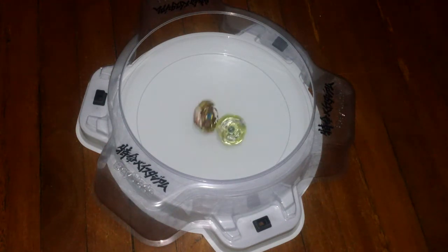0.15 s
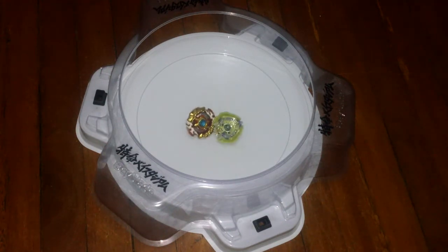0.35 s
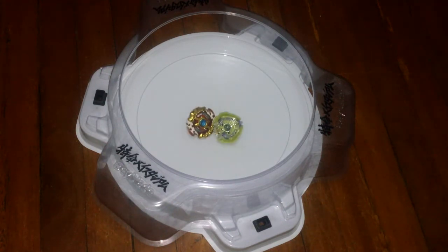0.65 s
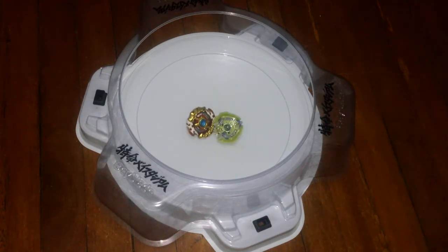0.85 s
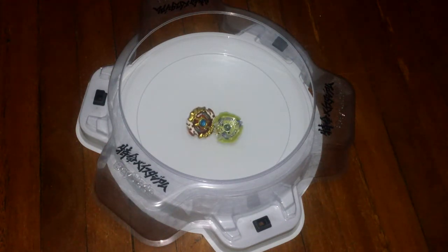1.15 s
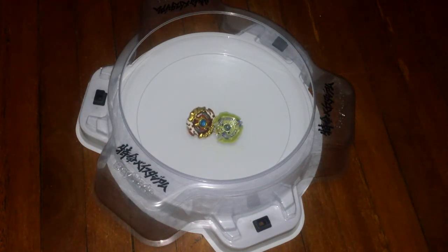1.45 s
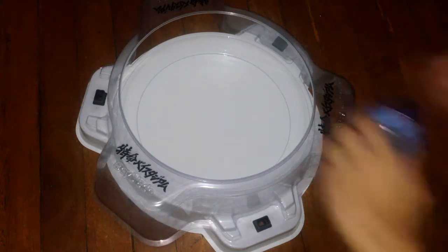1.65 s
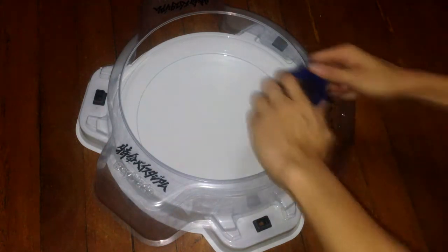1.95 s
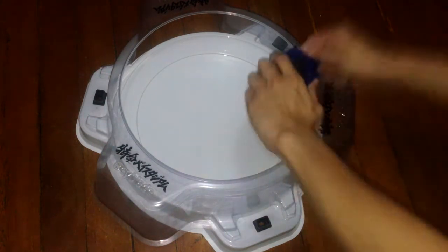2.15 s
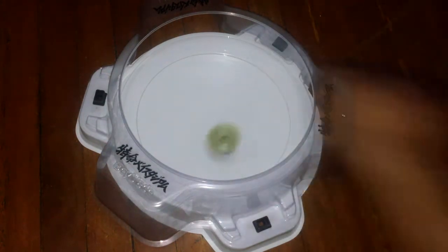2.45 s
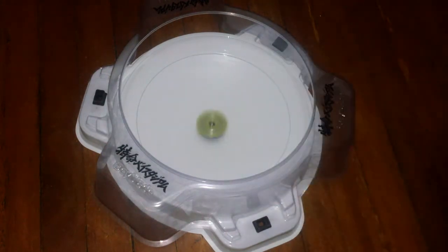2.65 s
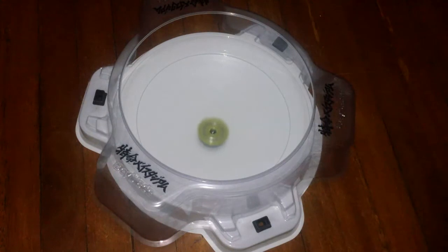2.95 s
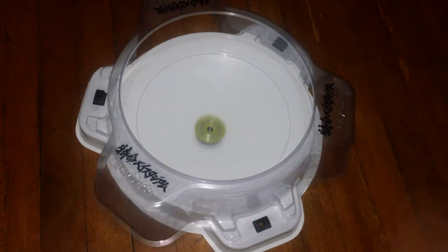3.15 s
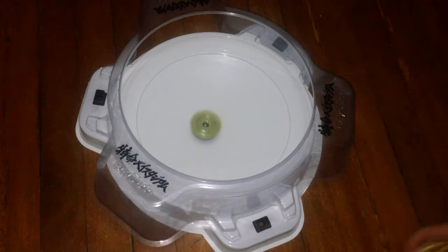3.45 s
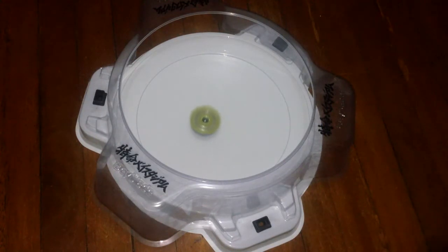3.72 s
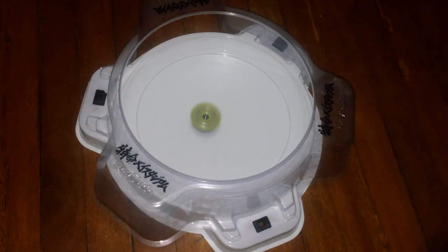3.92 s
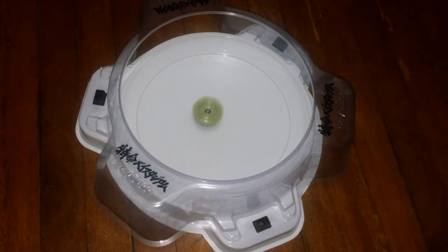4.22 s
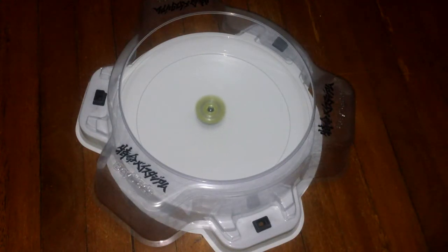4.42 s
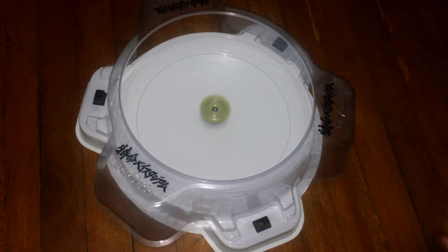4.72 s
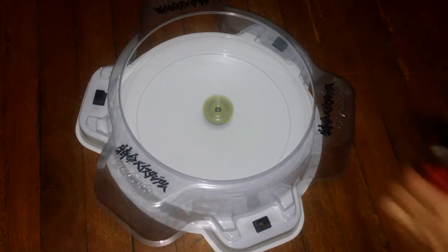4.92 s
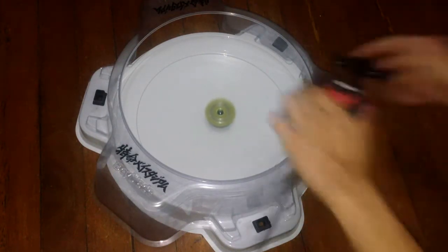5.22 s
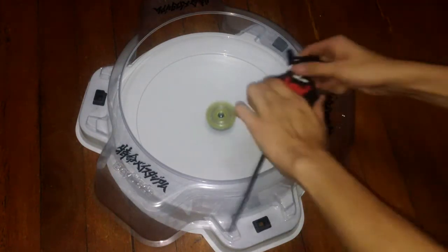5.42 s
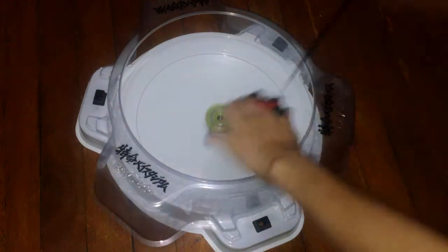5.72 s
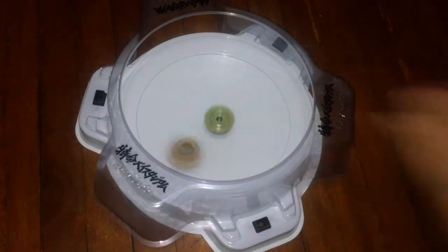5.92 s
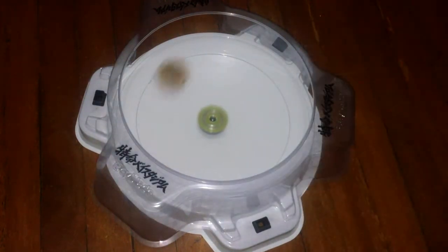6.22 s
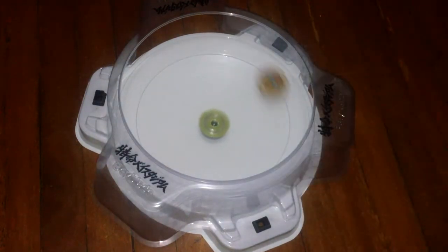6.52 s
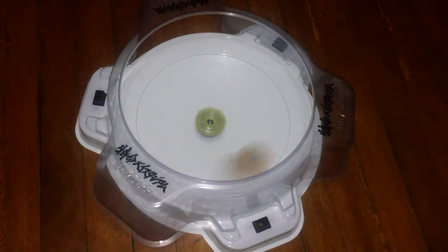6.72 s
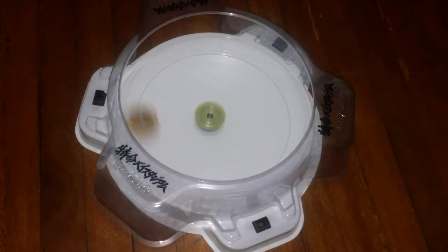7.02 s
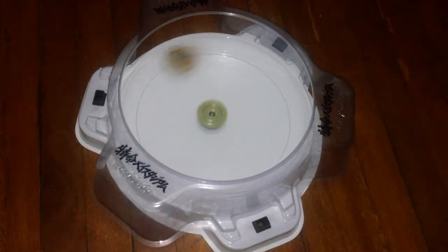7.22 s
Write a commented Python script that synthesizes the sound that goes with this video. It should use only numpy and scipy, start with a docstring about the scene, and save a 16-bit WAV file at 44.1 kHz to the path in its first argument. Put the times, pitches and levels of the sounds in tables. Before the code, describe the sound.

Close microphone, quiet hissy room with short echoes. Tops topple with a fading plastic rattle, then faint cord rasps and launcher clicks. A loud brightening ripcord rasp ends in a booming clack and quick bounces. Wooden knocks and a short scrape come as the launcher is put down, over a thin airy whirr. After light handling clicks, another rasp and clack launch a second top, which rumbles around the bowl in fluttering ticks.

```python
"""Two spent spinning tops topple and rattle to rest in a thin plastic bowl on a wooden floor, in a small room.
Twice a toothed ripcord rasps through a launcher, and a top drops into the bowl and bounces. The launcher is put down.
The first top whirrs at the centre; the second races round the rim, ticking once a turn and hitting the wall.
Blows and contacts shake ringing modes, the pitches at which a body rings; filtered noise makes whirr and hush."""
import sys
import numpy as np
from scipy import signal
from scipy.fft import rfft, irfft, next_fast_len
from scipy.io import wavfile
from scipy.ndimage import uniform_filter1d

SR = 44100
rng = np.random.default_rng(int(sys.argv[2]) if len(sys.argv) > 2 else 0)


def dump_mix(stems):
    """Bounce the given channels to the path in sys.argv[1] as a 16-bit WAV at rate SR."""
    frames = np.atleast_2d(stems).T  # one column per channel
    limited = np.clip(frames, -1, 1)  # hard clip at full scale
    pcm = np.round(limited * 32767).astype(np.int16)
    wavfile.write(sys.argv[1], SR, pcm)


N = 324884

# The ringing modes of the plastic bowl, the launcher shell and the floorboards.
# Each row: pitch in Hz, relative level in dB, time to die away by 60 dB in seconds.
BOWL_MODES = [(146, -10, 0.23), (203, -14, 0.086), (268, -3, 0.036), (307, 0.5, 0.067), (373, -4, 0.051),
              (489, -3, 0.083), (587, -2, 0.065), (699, 9, 0.0087), (941, -10.5, 0.058), (1010, 12, 0.051),
              (1514, -2, 0.01), (2510, 12.5, .03), (3010, 0, 0.023), (3840, -8.5, 0.016)]
LAUNCHER_MODES = [(485, -2.5, 0.047), (1020, -1, .015), (2020, 2, .012), (2530, 2.5, 0.054),
                  (2725, -7.5, 0.021), (3460, 2.5, 0.027), (3830, -4, 0.024), (3890, 10, 0.02),
                  (4735, 4.5, .016), (5100, -2, 0.012), (5644, 10, 0.0028), (7200, -2, 0.016)]
BOARD_MODES = [(320, -10, 0.072), (372, 18.5, 0.15), (440, 14, 0.081), (517, 25.5, 0.05), (970, 19, 0.035),
               (1165, 30, 0.041), (1890, -17, 0.071), (2900, -8, 0.063), (3700, 10, 0.013)]


def landing_blows():
    """Launched tops strike the bowl hard, then bounce."""
    # Blows of the tops on the bowl. Each row: time in seconds, clack level in dB, thump level in dB,
    # favoured pitch in Hz.
    landings = [(2.3517, -10, -1, 264), (2.5277, -15.5, -10, 380), (2.6237, -19.5, -16.5, 308),
                (2.6721, -26, -29, 280), (5.8113, -13.5, -1, 290), (5.9762, -20, -12.5, 790),
                (5.9982, -30.5, -17.5, 293), (6.0803, -25.5, -9.5, 460)]
    return bowl_blows(landings, first_db=25.5, lowest_hz=120, chatter_s=0.01, knock_db=-3.0, tick_db=-3)


def ripcord():
    """Teeth rattle over the gear and ring the launcher shell, denser and brighter as the cord speeds up."""
    # Pulls of the cord, speeding up evenly until it stops or comes free.
    # Each row: start in seconds, free in seconds, start level in dB, end level in dB.
    pulls = [(0.77, 0.811, -52, -44.5), (0.848, 0.908, -51.5, -42.5), (2.202, 2.307, -37, -14.5),
             (5.659, 5.752, -34, -22.5)]
    # Tone of the cord's rasp. Each row: frequency in Hz, level in dB per Hz.
    cord_colour = [(240, -63.5), (400, -31), (907, -15), (979, -8), (1520, -16), (2470, -7.5),
                   (2870, -13.5), (4070, -4), (4670, -9), (6130, -10), (15000, -28.5)]
    coast_db, coast_db_per_s = -2, 238.5  # the freed gear runs down: first drop, then fall per second
    teeth_per_s, full_speed_db = 6400, -13  # contacts at full speed, and the level of the rasp there
    slow_cord_hz, brightening = 3000, .3  # a slow cord loses the treble above this; dB per dB of speed

    t = np.arange(N) / SR
    speed = np.full(N, 1e-6)
    for start, free, start_db, end_db in pulls:
        pull = np.interp(t, [start - .03, start, free], [0, *from_db([start_db, end_db])])
        coast = from_db(end_db + coast_db - coast_db_per_s * np.maximum(t - free, 0))
        speed += np.where(t < free, pull, coast)
    share = np.clip(speed / from_db(full_speed_db), .03, 1)
    teeth = grains(teeth_per_s * np.sqrt(share), spread_db=3.5)
    # fewer contacts are made stronger, so that speed alone sets the level
    teeth = teeth / share ** .25 * from_db(0.87 * drift(30))
    shell = rms_one(ring(teeth, LAUNCHER_MODES[1:]))
    rasp = rms_one(colour(teeth, cord_colour) + from_db(-6.0) * shell)
    low = signal.sosfilt(signal.butter(2, slow_cord_hz, "low", fs=SR, output="sos"), rasp)
    high = signal.sosfilt(signal.butter(2, slow_cord_hz, "high", fs=SR, output="sos"), rasp)
    # the minus sign joins the two halves smoothly where they meet
    return speed * (low - high * share ** brightening)


def launcher_blows():
    """The latch, the release of the top and handling knock the launcher shell."""
    # Blows on the launcher. Each row: time in seconds, clack level in dB, favoured pitch in Hz.
    clacks = [(0.9387, -21, 5100), (1.0258, -33, 2650), (2.164, -31.5, 3460), (2.3027, -7, 2550),
              (3.8405, -52.5, 3460), (4.0255, -38.5, 4070), (4.0683, -45, 3080), (4.25, -43, 4410),
              (4.3274, -33, 4310), (4.538, -46.5, 2760), (4.8509, -48, 3500), (5.658, -19.5, 3600),
              (5.7385, -11, 4000), (5.7462, -2, 3730), (5.7552, -4, 3840)]
    # dB, and dB per dB of clack: only hard blows move the whole shell
    thump_db, thump_per_clack = -12.5, 2
    table = [(s, db, thump_db + thump_per_clack * db, hz) for s, db, hz in clacks]
    return blows(table, LAUNCHER_MODES, first_db=18, lowest_hz=200, chatter_s=0.0037, knock_db=-0.5,
                 tick_db=0.5, crack_db=2.0, crack_s=0.0011, rustle_db=-11.0, rustle_s=0.023)


def racing_top():
    """The leaning top touches hard once a turn, over a steady grind, and moves over the modes of the bowl."""
    # Path of the racing top. Each row: time in seconds, rumble level in dB,
    # pitch in Hz of the bowl modes under its tip.
    path = [(6.128, -33.5, 360), (6.22, -32.5, 343), (6.362, -35, 446), (6.5, -36.5, 510), (6.6, -32, 576),
            (6.67, -39.5, 412), (6.73, -34.5, 320), (6.81, -35.5, 430), (6.87, -27.5, 514),
            (6.93, -41.5, 433), (6.98, -36.5, 362), (7.06, -31, 514), (7.22, -32, 440), (7.37, -36, 473)]
    ticks_per_s = 43.5  # on average; the pace drifts
    base_scrape_db, scrape_follows = -41, 0.26  # at a rumble of -33 dB; share of its swing

    turns = np.cumsum(ticks_per_s * (1 + .04 * drift(4.4))) / SR
    touch = np.exp(-(turns % 1) / .1) * from_db(3 * drift(20))
    s, rumble_db, hz = np.transpose(path)
    scrape_db = base_scrape_db + scrape_follows * (rumble_db + 33)
    wobble = from_db(2.52 * drift(13.4))
    gains = gains_in_time(np.transpose([s, rumble_db, scrape_db])) * wobble
    under_hz = np.interp(np.arange(N) / SR, s, hz)
    contact = rng.standard_normal(N) * (0.41 + touch)
    return rolling(gains, BOWL_MODES, contact, ring_db=5.5, lowest_hz=52, under_hz=under_hz)


def wall_blows():
    """The racing top clatters along the wall of the bowl."""
    # Blows on the wall. Each row: time in seconds, clack level in dB, thump level in dB, favoured pitch in Hz.
    wall_hits = [(6.4008, -26, -17.5, 636), (6.4114, -26, -22, 300), (6.4345, -27.5, -15, 620),
                 (7.0779, -28.5, -16.5, 600), (7.1025, -23.5, -18, 505), (7.1194, -32, -19, 467)]
    return bowl_blows(wall_hits, first_db=29.5, lowest_hz=252, chatter_s=0.012, knock_db=1.5, tick_db=-4)


def rattle_blows():
    """Spent tops topple, rattle to rest and are lifted out, each contact a small blow on the bowl."""
    # Blows of the spent tops. Each row: time in seconds, clack level in dB, thump level in dB,
    # favoured pitch in Hz.
    rattles = [(0.0044, -32.5, -38, 275), (0.0459, -25, -47, 1020), (0.0733, -39, -32.5, 1020),
               (0.0879, -34, -33.5, 270), (0.1341, -47, -34.5, 220), (0.1594, -40.5, -40, 1550),
               (0.2242, -66, -61, 1020), (0.3249, -37.5, -42, 1520), (1.4618, -39.5, -43.5, 489),
               (1.508, -48, -51, 1960)]
    return bowl_blows(rattles, first_db=15, lowest_hz=119, chatter_s=0.017, knock_db=-1.5, tick_db=-8)


def toppling_tops():
    """Spent tops roll in the bowl with uneven contacts, fading away."""
    # Spells of toppling. Each row: start in seconds, end in seconds, fade in dB per second,
    # rumble level in dB, scrape level in dB.
    toppling = [(0.0, 0.41, 58.5, -38.5, -36.5)]
    contact = grains(900, spread_db=-2.0)
    return rolling(spells(toppling), BOWL_MODES, contact, ring_db=3.0, lowest_hz=80, under_hz=300)


def skidding_top():
    """A top skids in the bowl with dense, uneven contacts."""
    # Spells of skidding. Each row: start in seconds, end in seconds, fade in dB per second,
    # rumble level in dB, scrape level in dB.
    skidding = [(2.36, 2.72, 36, -43, -30.5)]
    contact = grains(3700, spread_db=2.0)
    return rolling(spells(skidding), BOWL_MODES, contact, ring_db=8.5, lowest_hz=80, under_hz=290)


def floor_blows():
    """Launcher and cord are put down, knocking on the floorboards."""
    # Blows on the boards. Each row: time in seconds, clack level in dB, thump level in dB, favoured pitch in Hz.
    knocks = [(2.7915, -23.5, -27.5, 3000), (2.8877, -24, -17, 370), (2.9289, -34, -17.5, 366),
              (2.9532, -32, -20.5, 364), (3.001, -18, -52, 3380), (3.0268, -29, -38, 5840),
              (3.0524, -35, -22.5, 530), (3.1263, -48, -32, 430), (3.2321, -47, -46, 5960),
              (3.2465, -49, -32.5, 480), (3.3162, -44, -63, 5550), (3.3485, -36, -25, 510),
              (3.3616, -37, -35.5, 504), (3.4442, -43, -46, 533), (3.465, -40, -66, 2260)]
    return blows(knocks, BOARD_MODES, first_db=28, lowest_hz=270, chatter_s=0.0085, knock_db=-1,
                 tick_db=-12.5, crack_db=15.5, crack_s=0.0024, rustle_db=-12.0, rustle_s=0.051)


def floor_sliding():
    """Launcher and cord slide over the boards with very uneven contacts."""
    # Spells of sliding. Each row: start in seconds, end in seconds, fade in dB per second,
    # rumble level in dB, scrape level in dB.
    sliding = [(2.895, 3.15, 30, -27.5, -42.5), (3.3, 3.5, 34.7, -45, -50)]
    contact = grains(900, spread_db=6.0)
    return rolling(spells(sliding), BOARD_MODES, contact, ring_db=-5.5, lowest_hz=277, under_hz=370)


def whirr():
    """Shaped noise: faint air hiss as the hands come in, then the unsteady whirr of the top at the centre."""
    # Spells of hiss, then whirr. Each row: start in seconds, end in seconds,
    # fade in dB per second (below zero it grows), level in dB.
    whirr_spells = [(1.8, 2.2, -11.5, -61), (2.36, 5.8, 0.57, -57)]
    # Tone of the moving air. Each row: frequency in Hz, level in dB per Hz.
    whirr_colour = [(350, -22), (600, -8), (1210, -6.5), (1590, -6.5), (1850, -6), (2840, -8), (3300, -7.5),
                    (3930, -6.5), (12000, -25), (15600, -54), (22000, -120)]
    air = colour(rng.standard_normal(N), whirr_colour)
    return spells(whirr_spells)[0] * air * from_db(1.474 * drift(25.5))


def hush():
    """Steady filtered noise: the quiet of the room and a soft hiss."""
    # Tone of the quiet. Each row: frequency in Hz, level in dB per Hz.
    hush_colour = [(15, -60), (25, -15), (104, -5.5), (152, -7), (204, -11.5), (305, -13), (379, -16),
                   (410, -12.5), (631, -18), (920, -25), (5430, -23.5), (5890, -23), (15500, -28.5)]
    return from_db(-56.5) * colour(rng.standard_normal(N), hush_colour)


def room(x):
    """Dense echoes that die band by band."""
    # How long the echoes last. Each row: frequency in Hz, time to die away by 60 dB in seconds.
    echo_times = [(100, .3), (300, 0.31), (1000, 0.32), (3000, 0.31), (8000, 0.33), (15000, 0.067)]
    t = np.arange(SR // 2) / SR
    tail = 0
    for low in 60 * 2.0 ** np.arange(8):  # eight octaves
        band = signal.butter(2, [low, 2 * low], "band", fs=SR, output="sos")
        decay = from_db(-60 * t / at_hz(echo_times, low * np.sqrt(2)))
        tail = tail + signal.sosfilt(band, rng.standard_normal(len(t))) * decay
    tail *= np.clip((t - .002) / 0.018, 0, 1)  # first walls are some way off
    return signal.fftconvolve(x, tail / np.sqrt(np.sum(tail ** 2)))[:N]


def bowl_blows(table, **contact):
    """Blows on the thin shell of the bowl."""
    return blows(table, BOWL_MODES, crack_db=11.5, crack_s=0.0027, rustle_db=-13.5, rustle_s=0.086, **contact)


def blows(table, modes, lowest_hz, first_db, chatter_s, knock_db, tick_db, crack_db, crack_s, rustle_db, rustle_s):
    """Each blow is a dying chatter of contacts; it rings the body and cracks, low and high at its own strength."""
    # Upper edges of the bands of a blow, in Hz: thump, knock, clack, tick.
    band_edges = [700, 2000, 6000, 12500]
    knock_follows_thump = 0.62  # the knock lies between thump and clack
    tick_per_clack = 1.323  # dB per dB: harder blows are brighter
    low_crack_db = -9.5  # the thump is mostly ringing

    span = np.arange(4096) / SR
    out = np.zeros(N + len(span))
    hz, mode_db, t60 = np.transpose(modes)[:, :, None]
    rings = np.sin(2 * np.pi * hz * span) * from_db(mode_db - 60 * span / t60)
    edges = list(zip([lowest_hz, *band_edges[:-1]], band_edges))
    bands = [signal.butter(2, edge, "band", fs=SR, output="sos") for edge in edges]
    for s, clack, thump, struck_hz in table:
        knock = knock_db + clack + knock_follows_thump * (thump - clack)
        tick = tick_db + tick_per_clack * clack
        # the place struck favours the modes near one pitch
        away_db = -14.0 * np.abs(np.log2(hz / struck_hz))
        body = np.sum(rings * from_db(away_db + rng.normal(0, 3, hz.shape)), axis=0)
        for k, (band, db) in enumerate(zip(bands, [thump, knock, clack, tick])):
            # countless small modes die as a burst of noise, after one sharp click
            crack = rng.standard_normal(len(span)) * np.exp(-span / max(crack_s, .0003))
            crack[0] = 8.5
            # without bass, weaker in the treble
            crack = signal.lfilter([1, -1], np.convolve([1, -.7], [1, -.96]), crack)
            crack = from_db(crack_db + (k == 0) * low_crack_db) * crack
            chatter = rng.standard_normal(len(span)) ** 3 * np.exp(-span / max(chatter_s, .0005))
            chatter[0] = from_db(first_db)  # the first contact is firm
            struck = signal.fftconvolve(chatter, body + lean(crack, struck_hz))[:len(span)]
            sound = signal.sosfilt(band, struck)
            # the surface rustles on after the blow, in no fixed pitches and not in the bass
            rustle = rng.standard_normal(len(span)) * np.exp(-span / rustle_s) * np.clip(span / 0.0088, 0, 1)
            rustle = signal.sosfilt(band, lean(rustle, struck_hz))
            rustle *= from_db(rustle_db) / np.sqrt(uniform_filter1d(rustle ** 2, size=512).max())
            rustle *= (k > 0) * np.linspace(1, 0, len(span))
            loudest = np.sqrt(uniform_filter1d(sound ** 2, size=256).max())
            out[round(s * SR):][:len(span)] += from_db(db) * (sound / loudest + rustle)
    return out[:N]


def lean(x, hz):
    """A broad lift around one pitch, so that crack and rustle lean to the favoured pitch."""
    boost_db, sharpness_q = 12.5, 2.8
    return x + from_db(boost_db) * signal.lfilter(*signal.iirpeak(hz, sharpness_q, fs=SR), x)


def rolling(gains, modes, contact, ring_db, lowest_hz, under_hz):
    """Uneven contact under a moving thing: the body rumbles, most in the modes under it; the surface scrapes."""
    # Tones of the rumble and of the scrape. Each row: frequency in Hz, level in dB per Hz.
    rumble_colour = [(24, -47.5), (40, -23), (76, -2), (209, -14), (247, -18.5), (305, 7.5), (413, -2.5),
                     (481, 3.5), (1290, -14.5), (1500, -33), (1950, -6.5), (3300, -120)]
    scrape_colour = [(590, -39), (1000, 1.5), (1290, -9.5), (1470, -6), (2520, -11), (2890, -12),
                     (5750, -21.5), (13000, -35.5)]
    rumble_gain, scrape_gain = gains
    grind = rms_one(contact) + 1.24 * rng.standard_normal(N)  # the low modes feel a smoother force
    rings = 0
    for mode in modes:
        if mode[0] < 1300:
            away_db = -25.0 * np.abs(np.log2(mode[0] / under_hz))
            rings = rings + ring(grind * from_db(away_db), [mode])
    low = colour(grind, rumble_colour) + from_db(ring_db) * rms_one(rings)
    low = signal.sosfilt(signal.butter(2, lowest_hz, "high", fs=SR, output="sos"), low)
    return rumble_gain * rms_one(low) + scrape_gain * colour(contact, scrape_colour)


def grains(per_s, spread_db):
    """Random contacts of uneven size, pushing either way."""
    sizes = from_db(spread_db * np.minimum(rng.exponential(1, N), 4)) * rng.choice([-1, 1], N)
    return sizes * (rng.random(N) < per_s / SR)


def ring(force, modes):
    """Force into damped modes: each swings at its own pitch and dies at its own pace."""
    out = np.zeros(N)
    for k, (hz, db, t60) in enumerate(modes):
        r = from_db(-60 / (t60 * SR))  # what is left after one sample
        w = 2 * np.pi * hz / SR
        push = (-1) ** k * from_db(db) * np.sin(w)  # signs alternate from mode to mode
        out += signal.lfilter([0, push], [1, -2 * r * np.cos(w), r * r], force + 1e-18)
    return out


def spells(rows):
    """Each spell swells, fades or grows slowly while it lasts, and dies; one gain per level column."""
    swell_db_per_s, die_db_per_s = 1197, 299  # edges of a spell
    t = np.arange(N) / SR
    out = 0
    for start, end, fade_db_per_s, *levels_db in rows:
        edges_db = swell_db_per_s * np.maximum(start - t, 0) + die_db_per_s * np.maximum(t - end, 0)
        shape_db = -fade_db_per_s * (np.clip(t, start, end) - start) - edges_db
        out = out + from_db(np.maximum(shape_db, -200) + np.array(levels_db)[:, None])
    return out


def gains_in_time(rows):
    """Level columns as gains, silent outside the table."""
    s, *columns = np.transpose(rows)
    return [from_db(np.interp(np.arange(N) / SR, s, c, -140, -140)) for c in columns]


def drift(rate):
    """Slow random wandering of spread 1, mostly slower than the rate in Hz."""
    r = np.exp(-80 * np.pi * rate / SR)  # one step is 40 samples
    noise = rng.standard_normal(N // 40 + 2002)
    slow = signal.lfilter([1], [1, -2 * r, r * r], noise)[2000:]  # skip the settling
    return np.interp(np.arange(N) / 40, np.arange(len(slow)), rms_one(slow))


def colour(x, spectrum):
    """Filter of the given spectrum that never sounds early (minimum phase through the cepstrum); rms 1."""
    size = next_fast_len(N)
    cepstrum = irfft(np.log(from_db(at_hz(spectrum, np.fft.rfftfreq(8192, 1 / SR)))))
    cepstrum[1:4096] *= 2  # fold the second half onto the first
    pulse = irfft(np.exp(rfft(cepstrum[:4096], 8192)))
    return rms_one(irfft(rfft(x, size) * rfft(pulse, size), size)[:N])


def at_hz(points, hz):
    """A table by frequency, read on a log axis."""
    return np.interp(np.log(hz + 1), np.log(np.array(points)[:, 0]), np.array(points)[:, 1])


def rms_one(x):
    """Scaled to rms 1 (rms is a kind of average strength)."""
    return x / np.sqrt(np.mean(x ** 2) + 1e-20)


def from_db(db):
    """Gain of a level in dB."""
    return 10 ** (np.asarray(db) / 20)


def scene():
    """All sources with their echoes, over the whirr and the hush."""
    dry = landing_blows() + ripcord() + launcher_blows()
    dry += racing_top() + wall_blows()
    dry += rattle_blows() + toppling_tops() + skidding_top()
    dry += floor_blows() + floor_sliding()
    echoes = from_db(-11) * room(dry)
    return (dry + echoes + whirr() + hush())[None]


def record(dry):
    """The loudest blows overload and flatten; then the top is cut above 16 kHz."""
    flattened = np.clip(dry, -.86, .86)
    return signal.sosfilt(signal.cheby2(18, 80, 16000, fs=SR, output="sos"), flattened)


dry = scene()
out = record(dry)
dump_mix(out)
```